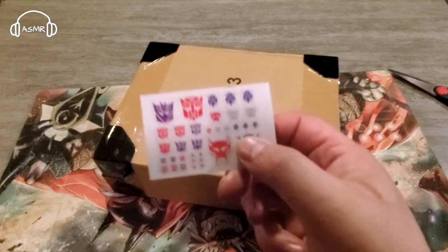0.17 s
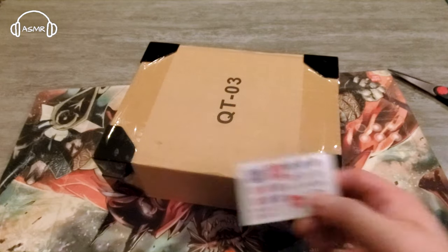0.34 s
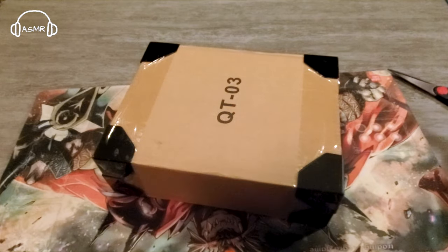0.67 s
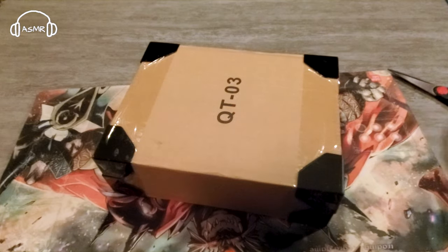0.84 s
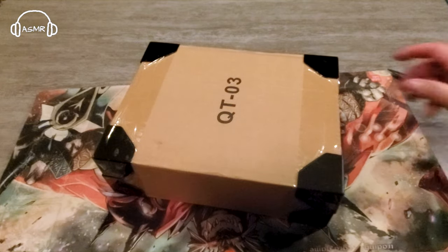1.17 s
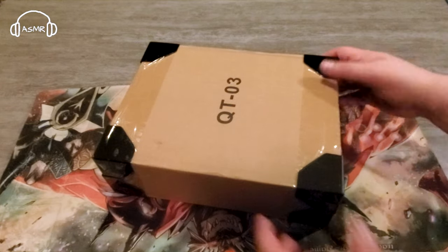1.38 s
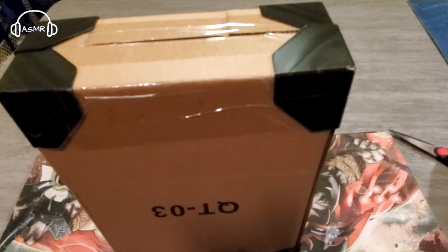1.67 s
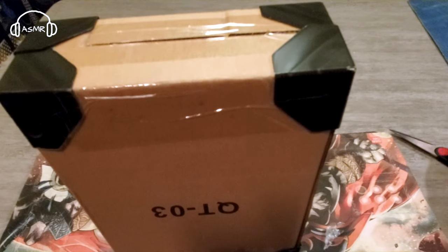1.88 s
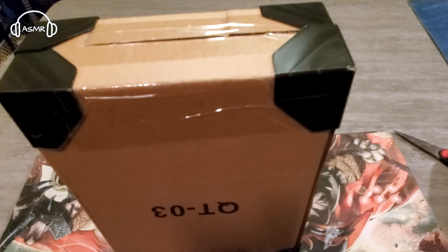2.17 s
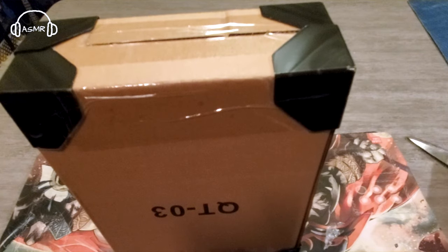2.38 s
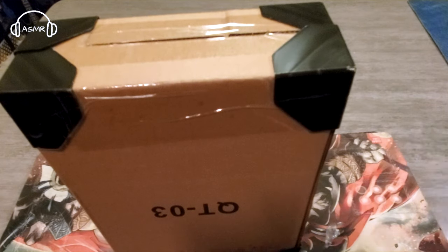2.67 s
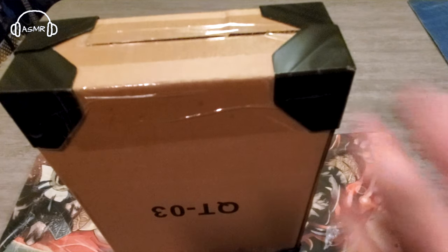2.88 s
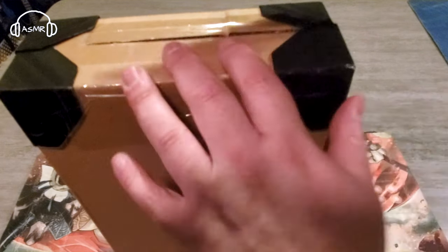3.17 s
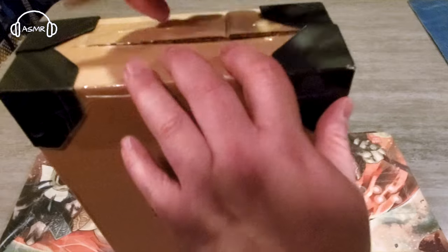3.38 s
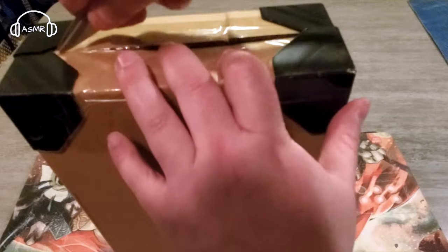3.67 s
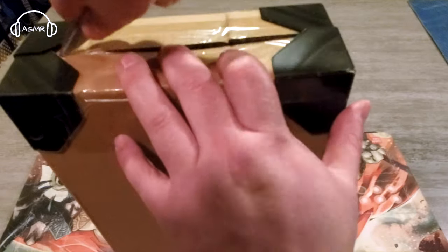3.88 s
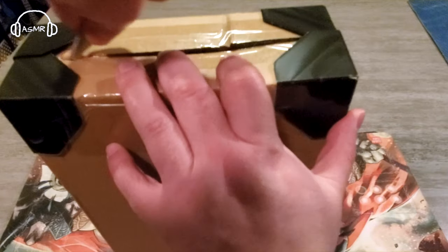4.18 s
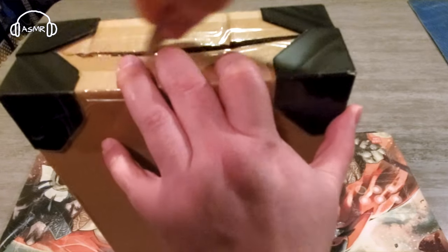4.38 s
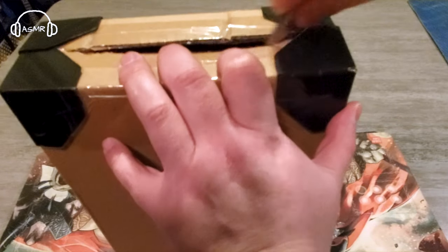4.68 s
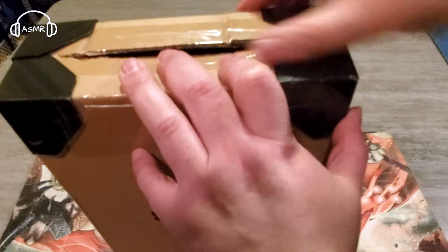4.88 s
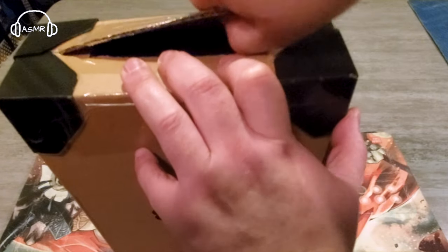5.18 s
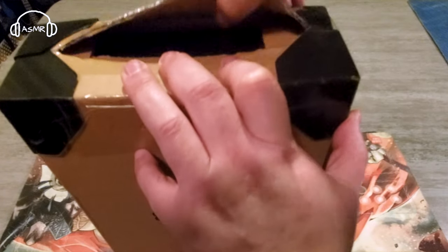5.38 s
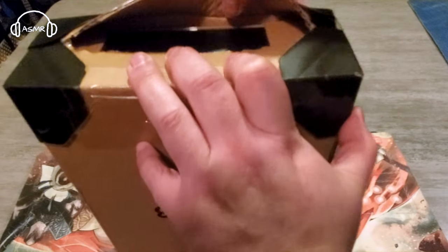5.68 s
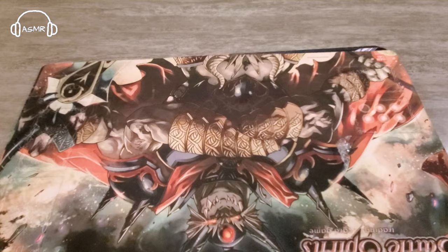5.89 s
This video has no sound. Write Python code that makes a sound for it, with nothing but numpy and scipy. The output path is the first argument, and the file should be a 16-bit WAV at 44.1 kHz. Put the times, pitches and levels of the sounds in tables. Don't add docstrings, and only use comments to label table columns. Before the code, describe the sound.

A quiet small room with faint low rumble and hiss, heard by close spaced microphones, the action leaning slightly right. For the first second there are only barely audible brushes; a light flat click comes at 1.0 s, and two soft taps near 1.55 s. At 2.2 s the hollow box knocks down on the mat, with a smaller settling tap at 2.4 s. A near-silent pause follows. From 3.2 to 3.7 s a palm lands with a low soft thump and fingers pat and rub. Tape ticks and snaps from 3.9 s, then from 4.37 to 4.9 s a blade rips loudly along it, gritty, crackling and hollow. After a brief hush, glue peels in small crackles from 5.0 s; a quick stuttering creak comes at 5.3 s, sharp pops at 5.37, 5.46, 5.55 and 5.68 s, and a smooth, brightening slide from 5.8 s to the end.

```python
import sys
import numpy as np
from scipy import signal
from scipy.fft import rfft, irfft
from scipy.io import wavfile
from scipy.ndimage import uniform_filter1d

SR = 44100
rng = np.random.default_rng(int(sys.argv[2]) if len(sys.argv) > 2 else 0)


def amplitude_ratio(level_db):
    exponent = np.asarray(level_db, float) / 20
    return 10 ** exponent


def pcm_store(signal):
    levels = np.round(np.clip(np.atleast_2d(signal), -1, 1) * 32767)
    wavfile.write(sys.argv[1], SR, levels.astype(np.int16).T)


N = 266584

# frequency in Hz, width in Hz, level in dB.
BOX_MODES = [(192, 145, 2), (196, 18, -15), (284.8, 62, 5.5), (286.8, 25, -6.5), (353, 84, -1.5)]
# frequency in Hz, level in dB.
FILM_COLOUR = [(6000, -16.5), (7500, -4.5), (10000, 2.5), (15000, -2.5), (16900, -6.5)]
# time in seconds, drag in dB, pressure on the walls in dB.
BLADE_RUN = [(4.366, -32.5, -27), (4.51, -37.5, -24), (4.628, -35.5, -28), (4.702, -37, -30.5),
             (4.752, -33, -30), (4.795, -42, -40), (4.808, -36, -22), (4.84, -40, -33), (4.881, -44.5, -41),
             (4.898, -29, -41)]


def evened(x):
    return x / np.sqrt(np.mean(x ** 2) + 1e-20)


def read(points, hz):
    f, value = np.transpose(points)
    return np.interp(np.log(hz + 1), np.log(f + 1), value)


def colour(points, size=2048):
    level_db = np.maximum(read(points, abs(np.fft.fftfreq(size, 1 / SR))), -100)
    log = np.log(amplitude_ratio(level_db))
    response = np.fft.ifft(np.exp(log - 1j * signal.hilbert(log).imag)).real
    return evened(response[:size // 2])


def ring(modes):
    t = np.arange(4096) / SR
    waves = [amplitude_ratio(db) * np.exp(-np.pi * width * t) * np.sin(2 * np.pi * hz * t) for hz, width, db in modes]
    return evened(sum(waves[::2]) - sum(waves[1::2]))


def pair(x):
    # frequency in Hz, left-right likeness from 0 to 1.
    likeness = [(60, 1), (300, 0.82), (640, 0.85), (1400, 0.35), (3000, 0.01), (16000, 0.0087)]
    same = np.clip(read(likeness, np.fft.rfftfreq(x.shape[1], 1 / SR)), 0, 1)
    a, b = rfft(x)
    return irfft(np.array([a, same * a + np.sqrt(1 - same ** 2) * b]), x.shape[1])


def through(x, response):
    return signal.oaconvolve(x, response[None], axes=1)[:, :x.shape[1]]


def sides(pan_db):
    return amplitude_ratio(np.reshape([pan_db / 2, -pan_db / 2], (2, -1)))


def touched_surfaces():
    # start in seconds, end in seconds.
    moments = [
        (1, 1.2),
        (2.05, 2.4),
        (2.4, 2.7),
        (3.2, 3.45),
        (4.36, 4.385),
        (5.455, 5.465),
    ]
    # frequency in Hz, level in dB.
    flat_sheet = [(650, -53), (1500, -11.5), (2800, -6), (3500, 4), (4700, -0.5), (5600, 3.5), (7000, -0.5),
                  (9000, -10)]
    box_on_mat = [(550, -0.5), (1150, -11), (1750, -2), (2450, -11.5), (3400, -2.5), (4400, -9.5),
                  (5300, -6), (7600, -20)]
    box_edge = [(560, 2.5), (1150, -15), (1780, 2.5), (2500, -21), (3200, -2), (3800, -7.5), (4400, -12.5),
                (6500, -21.5)]
    skin_on_tape = [(500, -4), (1500, -17), (2250, -19), (2800, -3), (3500, 0.5), (4500, -8), (6000, -8),
                    (8000, -25.5)]
    tape_pop = [(400, -17), (750, -13), (1100, -17), (1500, 7.5), (2200, 3), (3100, 8), (3900, 6.5),
                (6200, -5.5)]
    colours = [flat_sheet, box_on_mat, box_edge, skin_on_tape, tape_pop, tape_pop]
    return [(t0, t1, points) for (t0, t1), points in zip(moments, colours)]


def air():
    # frequency in Hz, level in dB.
    air_colour = [(15, -49.5), (25, 5), (74, -9.5), (142, -1), (202, -22), (313, -19.5), (433, -35.5),
                  (3060, -37), (5720, -31), (7510, -37), (8370, -34.5), (14400, -40), (16500, -48)]
    noise = through(rng.standard_normal((2, N)), colour(air_colour, size=8192))
    return amplitude_ratio(-65) * evened(pair(noise))


def room_tail():
    # frequency in Hz, time to fall by 60 dB in seconds.
    decay_times = [(100, 0.14), (400, 0.35), (1000, 0.29), (2800, 0.33), (7300, 0.24), (15000, 0.2)]
    taps = np.zeros((2, SR // 2))
    jitter = rng.integers(0, 10, (2, (SR // 2 - 291) // 10))
    at = np.arange(290, SR // 2 - 10, 10) + jitter
    np.put_along_axis(taps, at, rng.choice([-1., 1.], at.shape), 1)
    hz, t, z = signal.stft(pair(taps), SR, nperseg=128)
    fade = amplitude_ratio(-60 * t / read(decay_times, hz)[:, None])
    tail = signal.istft(z * fade, SR, nperseg=128)[1]
    return tail / np.linalg.norm(tail[0])


def swell(u, length):
    return np.sin(np.pi * np.clip(u, 0, 1)).clip(0) ** 0.79


def scuff(u, length):
    rise_s, fade_db = 0.0038, -24
    return np.clip(u * length / rise_s, 0, 1) * amplitude_ratio(fade_db * u.clip(0))


def strokes(rows, shape, t):
    power = np.zeros((2, 2, len(t)))
    for s, length, db, rel_db, *pan_db in rows:
        if t[0] - .02 <= s < t[-1]:
            one = (shape((t - s) / length, length) * sides(sum(pan_db))) ** 2
            power += one * amplitude_ratio([[[2 * db]], [[2 * (db + rel_db)]]])
    return power


def efforts(t):
    # start in seconds, length in seconds, rasp in dB,
    # fizz relative to it in dB, left-right difference in dB.
    brushes = [(.26, 0.33, -76.5, -4.5, -21), (.5, 0.37, -74.5, 1, -8), (1.2, 0.65, -74, 0.5, -15),
               (1.68, 0.43, -79, 2.5, -15.5), (2.36, 0.14, -53.5, -33, -9), (2.8, 0.32, -80, 1.5, -24.5),
               (3.1, 0.17, -89, 10.5, -24), (3.49, 0.14, -57.5, -4.5, -4.5),
               (3.95, 0.21, -54.5, -2.5, -5.5), (4.14, 0.29, -55.5, -7, -8), (4.24, 0.12, -46.5, -1, -2.5),
               (4.933, 0.053, -68.5, 3, -17), (4.972, 0.076, -43.5, -9.5, -6.5),
               (5.12, 0.17, -46.5, -1, -5), (5.25, 0.14, -42.5, -9, -4), (5.672, 0.36, -40, -7.5, -2)]
    # seconds, seconds, dB, dB, dB.
    scuffs = [(.755, 0.16, -56, -32, -8), (1.02, 0.11, -51.5, -24, -20), (1.475, 0.16, -66.5, -21, -21),
              (2.1, 0.62, -74.5, -25, -15), (2.19, 0.12, -37, -33, -10.5), (2.424, 0.16, -53.5, -37, -13),
              (3.235, 0.14, -59, 1, -13.5), (3.38, 0.15, -65.5, -0.5, -9.5), (3.49, 0.16, -58, 6, -2),
              (3.9, 0.11, -60, -1, -12), (5.42, 0.22, -72, -12, -6)]
    # start in seconds, length in seconds, box walls in dB,
    # table thud relative to them in dB.
    pushes = [(0, 0.14, -72, 0), (.3, 0.32, -89, 19), (.74, 0.095, -53, -3), (1.05, 0.31, -85.5, 21.5),
              (1.47, 0.083, -53, 0), (1.6, 0.14, -74.5, 23.5), (1.7, 0.22, -71, -10),
              (1.83, 0.24, -66, 6.5), (2.07, 0.32, -55, 8), (2.175, 0.17, -49.5, -15),
              (2.41, 0.21, -57, -4), (2.62, 0.68, -73, 13.5), (3.0, 0.14, -77, 4), (3.13, 0.23, -72.5, 23),
              (3.25, 0.089, -57.5, 2), (3.36, 0.073, -56.5, 9.5), (3.47, 0.16, -55, -1),
              (3.63, 0.098, -54.5, 0.5), (3.9, 0.25, -53.5, 1.5), (4.23, 0.22, -41, 2),
              (4.34, 0.13, -42.5, 16), (4.65, 0.059, -30, 2), (4.7, 0.088, -31.5, -6),
              (4.76, 0.095, -39.5, 14.5), (4.93, 0.05, -59, 23.5), (5.0, 0.06, -48.5, 7),
              (5.08, 0.18, -42.5, -3), (5.25, 0.16, -30.5, 2.5), (5.42, 0.26, -53.5, -4),
              (5.66, 0.16, -48, 2.5), (5.78, 0.25, -53, -9), (5.92, 0.54, -38.5, -12)]
    surface = strokes(brushes, swell, t) + strokes(scuffs, scuff, t)
    box = strokes(pushes, swell, t)

    s, drag_db, press_db = np.transpose(BLADE_RUN)
    cutting = (t > s[0]) & (t < s[-1])
    drag = cutting * amplitude_ratio(np.interp(t, s, drag_db)) * sides(-4)
    press = cutting * amplitude_ratio(np.interp(t, s, press_db))
    blade_fizz_db, blade_thud_db = -6, -27

    slide_s, slide_db, slide_pan_db = 5.775, -42, -13
    grows_db_per_s, brightens_db_per_s = 2.5, 18
    since = t - slide_s
    slide = (since > 0) * amplitude_ratio(slide_db + grows_db_per_s * since) * sides(slide_pan_db)
    slide_fizz = slide * amplitude_ratio(brightens_db_per_s * since)

    return np.sqrt([surface[0] + drag ** 2 + slide ** 2,
                    surface[1] + (drag * amplitude_ratio(blade_fizz_db)) ** 2 + slide_fizz ** 2,
                    box[0] + press ** 2,
                    box[1] + (press * amplitude_ratio(blade_thud_db)) ** 2])


def slipping(spread_db):
    fibres_per_s, fibre_db, fibre_spread_db = 450, -5, 3
    size = len(spread_db)
    drift = uniform_filter1d(rng.standard_normal(size), size=200)
    catch = evened(uniform_filter1d(drift, size=90))
    torn = rng.random(size) < fibres_per_s / SR
    fibres = torn * amplitude_ratio(fibre_spread_db * rng.exponential(1, size).clip(0, 3))
    grain = 1 + uniform_filter1d(fibres, size=40) * 10 * spread_db * amplitude_ratio(fibre_db)
    clumps = amplitude_ratio(spread_db * np.clip(catch, -2, 2)) * grain
    steady = np.sqrt(uniform_filter1d(clumps ** 2, size=4000))
    return pair(rng.standard_normal((2, size))) * clumps / steady


def rubbing(part):
    # time in seconds, spread of slip sizes in dB, share of card colour from 0 to 1.
    grit = [(0, 1, .6), (3.2, 1.5, .6), (4.34, 2, .85), (4.4, 3.2, .95), (4.9, 2.6, .9), (4.95, 2.5, .8),
            (5.3, 1.5, .6), (5.77, 1, .4), (5.78, .5, .02)]
    # frequency in Hz, level in dB.
    card_colour = [(880, -19.5), (1500, -7.5), (2230, -6.5), (2680, -7), (3460, -5.5), (3730, -6),
                   (6030, -11.5), (6800, -10.5), (8840, -34), (15000, -120)]
    cloth_colour = [(150, -11), (250, -3.5), (623, 5.5), (783, -4.5), (2270, 2), (6200, 8), (9500, -10.5),
                    (12400, -53)]
    wall_colour = [(76, -35), (130, 2), (211, -1.5), (291, -11.5), (377, -6.5), (532, -6), (658, -8.5),
                   (1150, -12), (1260, -9), (2200, -25), (2860, -58), (4840, -120)]
    # frequency in Hz, width in Hz, level in dB.
    table_modes = [(62, 22, -11), (76, 16, 0), (120, 30, -8)]
    t = np.arange(part.start, part.stop) / SR
    rasp_gain, fizz_gain, walls_gain, thud_gain = efforts(t)
    s, *columns = np.transpose(grit)
    spread_db, card = (np.interp(t, s, c) for c in columns)
    slips, film, deep = slipping(spread_db), slipping(1.06 * spread_db), slipping(1.18 * spread_db)

    on_card = np.sqrt(card) * through(slips, colour(card_colour))
    on_cloth = np.sqrt(1 - card) * through(slips, colour(cloth_colour))
    rasp = evened(on_card + on_cloth)
    for t0, t1, points in touched_surfaces():
        if t[0] < t0 < t[-1]:
            rasp = np.where((t > t0) & (t < t1), evened(through(slips, colour(points))), rasp)
    cutting = (t > BLADE_RUN[0][0]) & (t < BLADE_RUN[-1][0])
    if cutting.sum() > 1000:
        rasp[:, cutting] += amplitude_ratio(-3.5) * seam(slips[:, cutting])

    surface = rasp * rasp_gain + evened(through(film, colour(FILM_COLOUR))) * fizz_gain
    box_body = 0.51 * colour(wall_colour, size=8192) / 64
    box_body[:4096] += .5 * ring(BOX_MODES) / 64
    walls = through((0.41 * slips + 0.73 * deep) * walls_gain, box_body)
    thud = through(deep * thud_gain, 0.59 * ring(table_modes) / 64)
    return surface + walls * sides(-4.0) + thud * sides(-0.25)


def squeak():
    # start in seconds, first pitch in Hz, last pitch in Hz, width in Hz, level in dB.
    whistle = (.29, 1420, 1230, 110, -69)
    t0, from_hz, to_hz, width_hz, db = whistle
    out, size = np.zeros(N), 4000
    turn = np.exp(2j * np.pi * np.cumsum(np.linspace(from_hz, to_hz, size)) / SR)
    noise = rng.standard_normal(size) + 1j * rng.standard_normal(size)
    fuzz = signal.lfilter([1], [1, -np.exp(-np.pi * width_hz / SR)], noise)
    out[round(t0 * SR):][:size] = amplitude_ratio(db) * evened((turn * fuzz).real) * np.hanning(size)
    return out * sides(-9.0)


def breaks():
    # time in seconds, crack peak in dB, box and fizz
    # relative to it in dB, left-right difference in dB.
    tap_rows = [(0.767, -74, -15, -28, -3), (1.0137, -32.5, -46, 0.5, -13.5), (1.477, -61, 2, -22, -14),
                (1.5414, -50, -3.5, -7, -5), (1.5593, -42.5, -8, -8, -5), (2.1004, -64, 16, -20, -7),
                (2.1888, -24.5, -15, -2, -2.5), (2.2005, -33.5, -4, -25, -9),
                (2.3854, -59.5, 8.5, 10.5, -10), (2.4212, -30.5, -15, -46, -10.5),
                (3.235, -47, -0.5, 6, -5), (3.258, -46, 6, 3.5, -6.5), (3.3765, -55.5, 6.5, -4, -5),
                (3.496, -42.5, -27, -30, -5), (3.635, -66.5, 16, -12, -7), (3.677, -62, -5, -15, -7)]
    # time in seconds, crack peak in dB,
    # box, panel and fizz relative to it in dB.
    catch_rows = [(3.486, -57, -28, -8, 5), (3.523, -54, -13, -9, -10), (3.637, -62.5, 8, 11, -4),
                  (3.6759, -58.5, 10.5, 10, -2), (3.683, -60.5, 16.5, -8, -13), (4.252, -52, -18, 12, -15),
                  (4.404, -35.5, 8, 4.5, -15), (4.4112, -35, 1, 1, -10), (4.431, -36, 10, 10, -14.5),
                  (4.449, -34, -3, 11.5, -15), (4.477, -33, 1, 9, -10), (4.511, -32, -7, 4, 2),
                  (4.55, -41, 19, 14, -15), (4.5569, -41.5, 16.5, 13, -15), (4.581, -33, -1, 8, -10),
                  (4.589, -30.5, 1, 7, -10), (4.6055, -34, 4, -5, -10), (4.673, -26.5, -4, 3, 1),
                  (4.684, -33, 8.5, -7, 10), (4.718, -35.5, 12.5, 9.5, -12), (4.744, -43, 0, 10, -13),
                  (4.822, -39.5, 9, -4, -11), (4.853, -33.5, 2.5, -11, -6), (4.878, -44, -7, -9, -7),
                  (4.8957, -28, -6.5, -11, 0), (5.146, -49.5, 13.5, 9.5, -15)]
    # time in seconds, crack peak in dB,
    # panel and fizz relative to it in dB.
    cut_rows = [(3.891, -57, -2, 12), (3.904, -45, 2, -1), (3.9385, -25, -0.5, 8.5), (4.0225, -52, -7, -4),
                (4.0468, -48, -4, 2), (4.074, -26, -14, -11), (4.086, -39, -31, -4),
                (4.1639, -42.5, -20, 0), (4.2, -40.5, -27, 2), (4.2158, -38.5, -10.5, 5),
                (4.284, -34.5, 2.5, -2), (4.309, -46.5, 12.5, -6), (4.367, -15, -8, 0),
                (4.3727, -16, 4.5, -12), (4.4539, -27, 2.5, -35), (4.4943, -32, 9, -8),
                (4.526, -40.5, 15.5, -11), (4.6314, -30, -23.5, 12), (4.6623, -25, 1, 3),
                (4.7106, -24.5, 1.5, -2), (4.7536, -17, -6, -3.5), (4.7794, -25.5, 0.5, -6),
                (4.801, -15, 0, -4), (4.8477, -23.5, -8, 5), (4.8875, -20.5, -10.5, 6),
                (4.606, -39, -17, 10)]
    # time in seconds, crack peak in dB,
    # panel and fizz relative to it in dB, left-right difference in dB.
    peel_rows = [(5.013, -30, -11, -11.5, -11), (5.0792, -37, -15, 4.5, -6), (5.1135, -39.5, -14, 3, -6),
                 (5.1181, -43, -12, 4, -13), (5.1435, -38, -9, 1, -4), (5.162, -33.5, -37, -15, -7),
                 (5.1693, -29, -35, 4.5, -10), (5.1871, -35, 2, 7, -3), (5.2074, -22.5, -19, -2, -6.5),
                 (5.2107, -27, -31, 2, -2), (5.3697, -17, -4.5, 1.5, -7.5), (5.4033, -31.5, -15, 6, -14),
                 (5.4618, -10, -11.5, -1.5, -3), (5.467, -25, -12, -1, -19), (5.5541, -19.5, -14, 0.5, -11),
                 (5.578, -37.5, -33, 12, -10), (5.6088, -57, -11, 14, -7), (5.661, -39, -35, 7.5, -7),
                 (5.6753, -19.5, -3.5, 3, -4.5), (5.683, -34.5, -7, 0, -18)]
    cut_pan_db, peel_box_db = -4, -58
    taps = [(s, db, box, -15.5 + 0.19 * box, fizz, pan) for s, db, box, fizz, pan in tap_rows]
    cuts = [(s, db, -9.5 + 1.93 * panel, panel, fizz, cut_pan_db) for s, db, panel, fizz in cut_rows]
    peels = [(s, db, peel_box_db, *rest) for s, db, *rest in peel_rows]
    catches = [(*row, cut_pan_db) for row in catch_rows]
    return taps + cuts + peels + catches


def snaps(rows, burst_ms, spike):
    # frequency in Hz, level in dB.
    crack_colour = [(1400, -72.5), (1900, -12.5), (2700, 1), (3400, -4), (5500, -3), (6800, -2),
                    (7600, -32), (10000, -22.5)]
    # frequency in Hz, width in Hz, level in dB.
    panel_modes = [(606.5, 50, 0.54), (742, 93, 10.8), (934, 410, 19.7), (1423, 398, 22.2),
                   (1918, 880, 24.4), (1827, 73, 0.75)]
    out, t = np.zeros((2, N + 6000)), np.arange(512) / SR
    responses = (colour(crack_colour), ring(BOX_MODES), ring(panel_modes), colour(FILM_COLOUR))
    tape, *box = (rfft(b, 8192) for b in responses)
    touched = [(t0, t1, rfft(colour(points), 8192)) for t0, t1, points in touched_surfaces()]
    draws = rng.standard_normal((len(rows), 3, 512))
    for (s, peak_db, *rel_db, pan_db), draw in zip(rows, draws):
        length_ms = burst_ms * amplitude_ratio(3.0 * draw[2, 0])
        shape = np.exp(-t * 1000 / length_ms) * np.minimum(t * 1000 / .3, 1)
        ears_noise = np.array([draw[0] + 1.55 * draw[1], draw[0] - 0.86 * draw[1]])
        burst = ears_noise * shape * amplitude_ratio(7.3 * draw[2])
        burst[:, 12] = spike * np.sign(draw[2, 1])
        flat = irfft(np.exp(1j * np.angle(rfft(burst)))) * np.sqrt(shape)
        surface = tape
        for t0, t1, response in touched:
            if t0 < s < t1:
                surface = response
        for body, db, ears in zip([surface] + box, [0] + rel_db, ([0, 1], [0, 0], [0, 0], [0, 1])):
            sound = irfft(rfft(flat[ears], 8192) * body)[:, :4096]
            sound *= amplitude_ratio(peak_db + db) / abs(sound).max() * sides(pan_db)
            out[:, round(s * SR) + 15:][:, :sound.shape[1]] += sound
    return out[:, :N]


def rings():
    # start in seconds, frequency in Hz, width in Hz, peak in dB.
    ring_rows = [(1.5625, 2980, 1500, -32), (2.4224, 590, 90, -41), (2.4225, 3500, 700, -24),
                 (3.9385, 690, 139, -22), (3.938, 1560, 300, -17), (4.0755, 2170, 300, -32),
                 (4.3745, 890, 200, -11.5), (4.457, 3300, 300, -24), (4.552, 1990, 150, -20.5),
                 (4.606, 1770, 250, -22), (4.7542, 6500, 5000, -4), (4.803, 1430, 500, -14),
                 (4.802, 4500, 3000, -10), (5.5542, 9000, 7000, -15), (5.3705, 4800, 1200, -13),
                 (5.462, 1300, 298, -13), (5.4627, 2860, 200, -12), (5.4632, 6200, 600, -12.5),
                 (5.467, 4600, 900, -10.5), (5.472, 2980, 200, -12.5), (4.4941, 1300, 500, -19.5),
                 (4.848, 3000, 1500, -17), (5.555, 2350, 370, -16.5), (5.555, 5000, 400, -15),
                 (5.579, 5600, 900, -18.5), (5.6762, 9000, 8000, -13), (5.6765, 1070, 300, -23),
                 (5.6765, 2050, 700, -14.5)]
    out = np.zeros(N + 4096)
    for s, hz, width, db in ring_rows:
        swing = ring([(hz, width, 0)])
        out[round(s * SR):][:4096] += amplitude_ratio(db) * swing / abs(swing).max()
    return out[:N] * sides(-6)


def thump():
    start_s, hz, width_hz, peak_db = 3.272, 59.3, 15, -32
    swing = ring([(hz, width_hz, 0)])
    return np.pad(amplitude_ratio(peak_db) * swing / abs(swing).max(), (round(start_s * SR), N))[:N]


def seam(slips):
    # frequency in Hz, width in Hz, level in dB.
    tape_modes = [(682, 80, 3), (915, 120, 4.5), (1300, 310, 6), (1810, 120, 4), (2880, 140, -6),
                  (3410, 170, 7), (4100, 150, -2), (4600, 170, -2), (6080, 360, 11)]
    patchy_db = 4.5
    out = np.zeros(slips.shape)
    drift = evened(uniform_filter1d(uniform_filter1d(slips[0], size=900), size=600))
    for k, mode in enumerate(tape_modes):
        hz, width, db = mode
        patch = amplitude_ratio(db + patchy_db * np.roll(drift, 2311 * k)) / np.sqrt(width)
        out += through(slips * patch, ring([mode])[:1024])
    return evened(out)


def creak():
    # frequency in Hz, width in Hz, level in dB.
    flap_modes = [(806, 730, 0.5), (1390, 290, -1.5), (1570, 260, 0), (2100, 190, -0.5), (2270, 220, -2),
                  (3380, 230, -3.5)]
    hollow_modes = [(190, 45, 0), (262, 60, -4)]
    # time of the slip in seconds, level in dB.
    slip_rows = [
        (5.2747, -1),
        (5.2877, 3),
        (5.299, 3.5),
        (5.309, 3.5),
        (5.3198, 1.5),
        (5.3274, 1),
        (5.3376, -0.5),
        (5.3483, -3),
    ]
    creak_db, hollow_db, fizz_db, tick_db = -14, -7.5, -9.5, -5.5
    hollow_lag_s, ragged = 0.0026, 0.36
    out, t = np.zeros(N + 4096), np.arange(4096) / SR
    flap, hollow = (b / abs(b).max() for b in (ring(flap_modes), ring(hollow_modes)))
    hollow = np.pad(hollow, (round(hollow_lag_s * SR), 0))[:4096]
    tick = amplitude_ratio(tick_db) * np.exp(-t * 1000 / 0.19)
    for s, db in slip_rows:
        puff = np.diff(rng.standard_normal(4097)) * np.exp(-t * 1000 / 2.5) / 3
        rough_flap = flap + ragged * np.convolve(flap, puff[:300])[:4096]
        slip = tick + rough_flap - amplitude_ratio(hollow_db) * hollow + amplitude_ratio(fizz_db) * puff
        out[round(s * SR):][:4096] += amplitude_ratio(creak_db + db) * slip
    return out[:N] * sides(-4.0)


def scene():
    # start in seconds, end in seconds.
    shots = [
        (0, 1.565),
        (1.565, 4.9),
        (4.9, 5.775),
        (5.775, 6.045),
    ]
    # time in seconds, crack peak in dB, box, panel and
    # fizz # relative to it in dB.
    more_snap_rows = [(3.155, -82.5, 27, -8, -5), (3.175, -88, 28, -8, -5), (3.193, -86, 25, -5, -5),
                      (3.207, -82, 27, -5, -5), (3.867, -68, -9, -8, 9), (3.948, -33, -10.5, -11, -5),
                      (4.057, -49, -9, 0.5, -6), (4.108, -58, -1, 7, -9), (4.12, -53.5, 5.5, 3, -10),
                      (4.21, -55, -15, 6, -12), (4.294, -46, -5, 12, -13), (4.303, -47, 4, 13, -13),
                      (4.877, -39, -13, -25, -1), (5.365, -33, -15, -15, 13.5)]
    # start in seconds, end in seconds, level
    # in dB.
    pause = (4.9, 5, -60)
    # time in seconds, share of the hits sent to the room in dB.
    distance = [(0, -2.5), (2.6, 2), (3.199, -7.5), (3.9, -9), (4.4, -9.5), (5, -9), (5.4, -6), (5.5, -5.5),
                (5.7, 1)]
    hits = amplitude_ratio(6.5) * snaps(breaks(), burst_ms=1.74, spike=6.85)
    flap = amplitude_ratio(-3.5) * creak() + squeak() + thump()
    swings = rings()
    tail, out = room_tail(), air()
    parts = [slice(round(t0 * SR), min(round(t1 * SR), N)) for t0, t1 in shots]
    rubs = [rubbing(part) for part in parts]
    more_snaps = [(*row, -4) for row in more_snap_rows]
    hits = hits + amplitude_ratio(6.0) * snaps(more_snaps, burst_ms=1.1, spike=6.7)
    hits[:, round(pause[0] * SR):round(pause[1] * SR)] *= amplitude_ratio(pause[2])

    hits_to_room = amplitude_ratio(np.interp(np.arange(N) / SR, *np.transpose(distance)))
    far = hits_to_room * hits + amplitude_ratio(-12.0) * flap + amplitude_ratio(-7) * swings
    for part, near in zip(parts, rubs):
        send = far[:, part] + amplitude_ratio(-9.5) * near
        wet = signal.fftconvolve(send.mean(0)[None], tail, axes=1)[:, :send.shape[1]]
        out[:, part] += hits[:, part] + flap[:, part] + swings[:, part] + near + wet
    return out


def gate_top(x):
    top_hz, edge_hz, opens_db = 15750, 250, -46
    weight = np.clip((np.fft.rfftfreq(N, 1 / SR) - top_hz) / edge_hz, 0, 1)
    top = irfft(rfft(x) * weight, N)
    level = np.sqrt(abs(uniform_filter1d((top ** 2).mean(0), size=200)))
    is_open = uniform_filter1d(1. * (level > amplitude_ratio(opens_db)), size=300)
    return x - top * (1 - is_open)


def band_limit(x):
    return signal.sosfilt(signal.butter(12, 17100, fs=SR, output="sos"), x)


def record(dry):
    spaced = np.array([np.pad(dry[0], (7, 0))[:N], dry[1]])
    low_cut = signal.butter(4, 54, "high", fs=SR, output="sos")
    top_cut = signal.ellip(8, .5, 70, 16900, fs=SR, output="sos")
    mix = gate_top(signal.sosfilt(np.vstack([low_cut, top_cut]), spaced))
    return band_limit(mix)


dry = scene()
out = record(dry)
pcm_store(out)
```